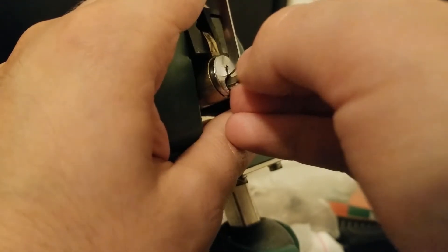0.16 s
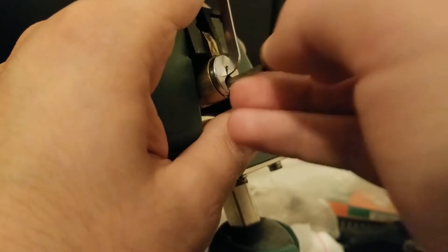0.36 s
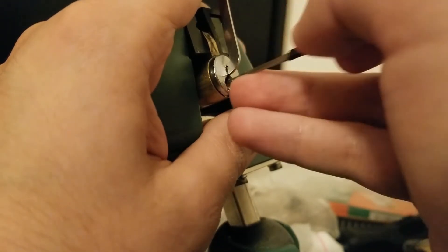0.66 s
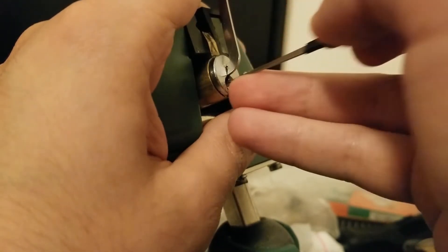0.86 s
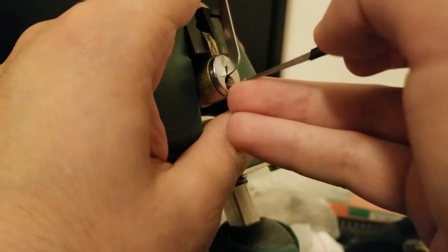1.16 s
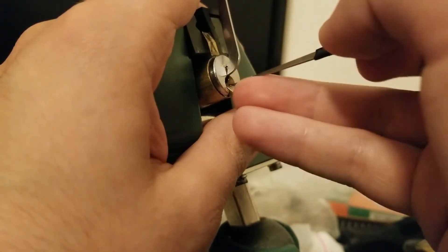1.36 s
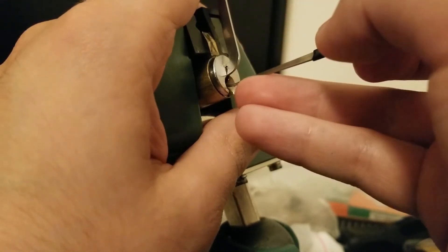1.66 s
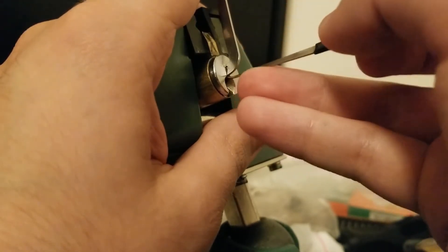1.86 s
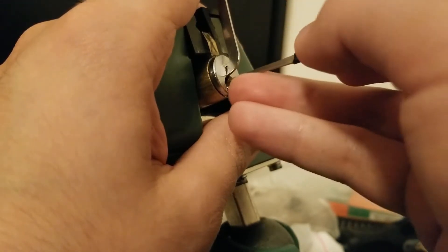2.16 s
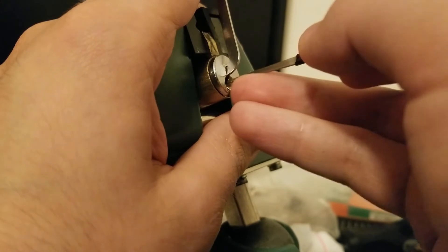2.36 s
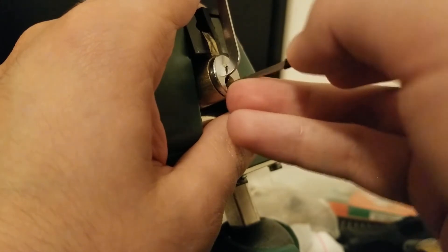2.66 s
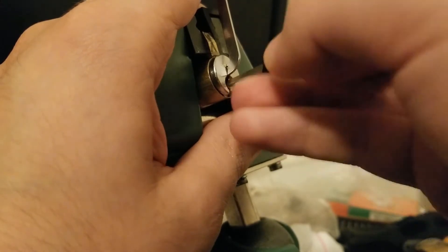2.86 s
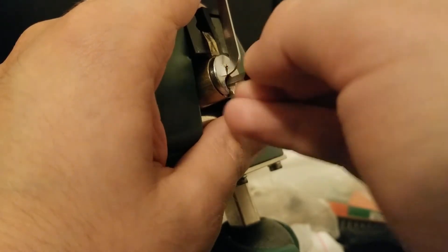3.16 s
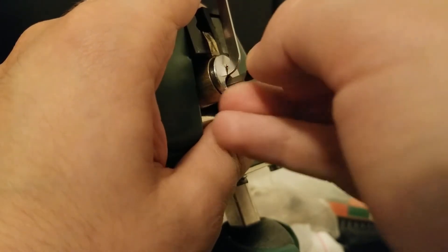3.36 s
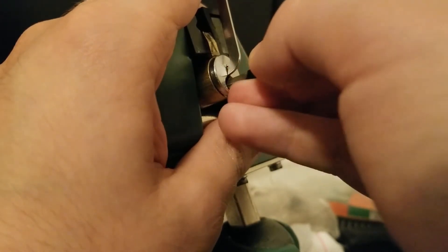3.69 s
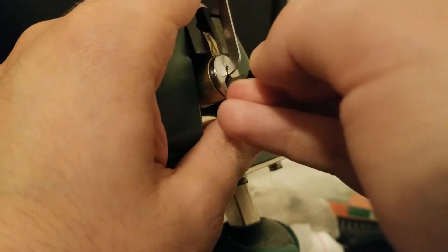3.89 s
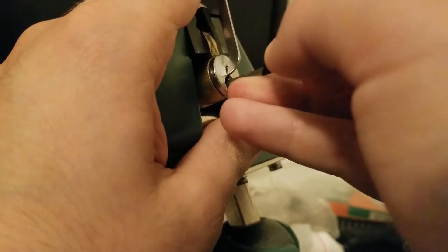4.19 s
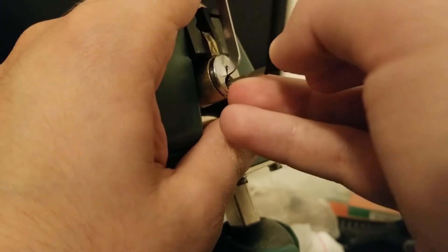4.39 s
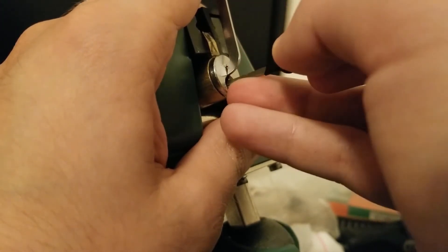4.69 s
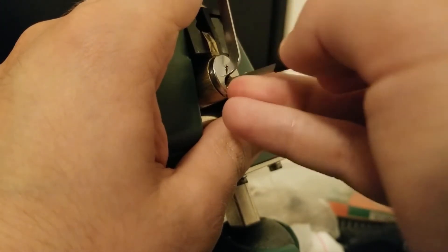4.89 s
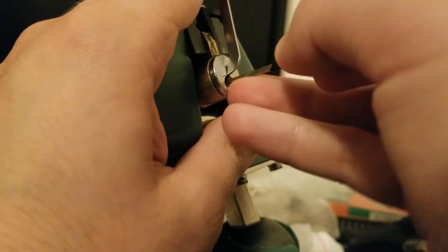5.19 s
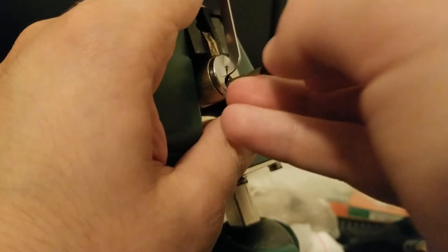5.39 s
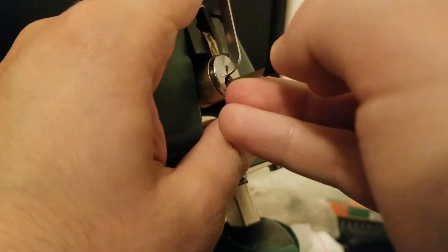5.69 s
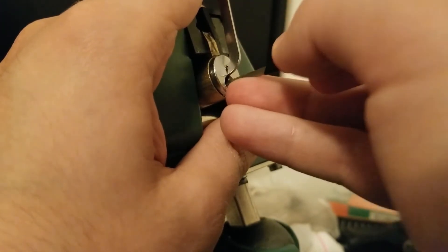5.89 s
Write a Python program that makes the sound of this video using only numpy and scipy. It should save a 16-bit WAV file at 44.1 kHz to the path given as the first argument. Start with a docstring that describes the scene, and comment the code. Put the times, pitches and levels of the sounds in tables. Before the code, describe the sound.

A small quiet room, close microphone, with soft low rumble and thin hiss throughout. From 0.2 to 0.65 s a steel pick makes faint, bright, crisp ticks in a lock, slightly to the right, while a barely audible low hum passes. Only room noise remains until about 1.9 s, when a few tiny clicks and a minute high squeak at 2.0 s appear. From 2.4 to 3.15 s the clicks grow busier, with a light knock at 2.47, a brighter tick and short rasp near 2.9, and a deep drone swelling around 2.6. Quiet again, with faint touches near 3.8 s. At 4.06 s a sharp double snap rasps and rings briefly. At 4.8 s comes the loudest hit, a hard metallic clack with scrape, vice ring and dull bench thump, rebounding until 4.9. Faint isolated ticks follow at 5.2, 5.5 and 5.9 s, ending around 6 s.

```python
"""In a small, quiet room a thin steel pick works the pins of a lock clamped in a vice, close to a camera.
Each contact is a short cluster of tiny impacts that rings the steel and knocks the lock body; in scrapes
the pick rasps along the keyway. Two bursts of hard slips stand out, and the second shakes the vice strongly.
One tiny squeak is a wavering tone. Behind it all lie filtered noise, for a faint rumble and hiss,
and two low wavering tones: a drone that swells and a hum that comes and goes."""
import sys
import numpy as np
from scipy import signal
from scipy.fft import rfft, irfft, next_fast_len
from scipy.io import wavfile
from scipy.ndimage import map_coordinates

SR = 44100
rng = np.random.default_rng(int(sys.argv[2]) if len(sys.argv) > 2 else 0)


def file_out(sig):
    """Save sig as 16-bit WAV at sys.argv[1]."""
    # one column per channel
    cols = np.atleast_2d(sig).T
    # limit, then scale
    lim = np.clip(cols, -1, 1)
    pcm = np.round(lim * 32767).astype(np.int16)
    wavfile.write(sys.argv[1], SR, pcm)


N = 266540


def contacts(knock_room_db=-13):
    """Each contact ticks the steel; from the slip on it also knocks the lock body."""
    # The pick slipping off a pin. Each row: start in seconds, length of the slip in seconds,
    # level of the steel tick in dB, its brightness in dB, level of the knock on the lock body in dB,
    # left level minus right level of the tick in dB.
    pin_slips = [(0.179, 0.0048, -38.5, 0.5, -77.5, -12), (0.281, 0.0064, -30, 2, -86, -6),
                 (0.298, 0.0079, -32.5, -0.5, -83, -7), (0.319, 0.005, -41.5, -4, -75, -12),
                 (0.333, .006, -37, -3, -78, -10), (0.464, 0.0016, -47, 5, -90, -8),
                 (0.4891, 0.0046, -40.5, -0.5, -78, -5), (0.516, 0.0045, -38.5, 0.5, -80, -14),
                 (0.637, 0.0049, -43.5, 3, -74.5, -15), (1.895, 0.00068, -46.5, 10.5, -86, 2),
                 (2.052, 0.0014, -40, 22, -66.5, -6), (2.113, 0.0015, -43, 12.5, -75.5, -23),
                 (2.397, 0.0033, -49, 10.5, -53, -7), (2.47, 0.0083, -30, -0.5, -57.5, -5),
                 (2.715, 0.0053, -35, 2, -56.5, -7), (2.742, .007, -32, 3.5, -55.5, -7.5),
                 (2.856, .0015, -43, 3, -71, -26), (2.8817, .0037, -27.5, 6, -74, -21),
                 (2.8855, 0.0054, -24.5, 1, -77, -12), (2.952, .0013, -41.5, -3, -70, -18),
                 (3.028, 0.002, -45, 6, -75, -24), (3.093, 0.0062, -38.5, -18, -65, -11),
                 (3.105, 0.0076, -30.5, 2.5, -73, -9), (3.133, 0.0028, -43, -2, -67, -13),
                 (3.775, 0.0032, -50.5, -11.5, -71.5, -14), (3.787, 0.01, -47.5, -5.5, -69, -20),
                 (4.0582, 0.007, -15.5, 0, -35, -9.5), (4.0836, 0.0024, -21.5, -3, -43, -17),
                 (4.0862, 0.0049, -17, -.5, -40, -6.5), (4.801, 0.0044, -15, -0.5, -16, -8.5),
                 (4.836, 0.004, -23, 3.5, -40.5, -14), (4.8419, .008, -15.5, 2, -32, -9),
                 (5.212, .0025, -38.5, -0.5, -60.5, -9), (5.489, .005, -63, -6.5, -91, -11),
                 (5.506, .003, -59.5, -6, -78, -14), (5.907, .0026, -47, 4.5, -80, -9)]
    # Faint ticks sound wetter than hard ones: room level falls with each dB of strength.
    usual_tick_db, tick_room_db, drier_db_per_db = -41, -4.5, 0.5
    out = np.zeros((2, N))
    for start, length, steel_db, bright_db, body_db, pan_db in pin_slips:
        room_db = tick_room_db - drier_db_per_db * (steel_db - usual_tick_db)
        for when, part_db in impacts(start, length, steel_db):
            ringing = steel(slip(length, alike=0.15), bright_db)
            tick = amp(steel_db + part_db) * packed(ringing, seconds=0.003)
            add(out, when, panned(tick, pan_db))
            add(out, when, amp(room_db) * room(tick))
            if when >= start:  # the light touch before the slip does not knock the body
                blow = softened(lock_body(slip(length, alike=0.51)), body_db)
                knock = amp(body_db + part_db) * packed(blow, seconds=0.012)
                add(out, when, panned(knock, pan_db=-1))
                add(out, when, amp(knock_room_db) * room(knock))
    return out


def impacts(start, length, steel_db):
    """A contact is a light touch, a slip and, if hard, two rebounds of the pin on its spring: (s, relative dB)."""
    touch_lead, touch_db, touch_max_db = 0.89, -11, -35.5  # lead in slip lengths, level against slip, upper limit
    hard_db = -26  # a stronger tick than this makes the pin rebound
    rebound_s, rebound_db, rebound_change_db = 0.011, -13, -7.5  # spacing, first level, change at the next
    touch = (start - touch_lead * length, min(touch_db, touch_max_db - steel_db))
    parts = [touch, (start, 0)]
    if steel_db > hard_db:
        for k in range(2):
            parts.append((start + (k + 1) * rebound_s, rebound_db + k * rebound_change_db))
    return parts


def slip(length, alike, size=4096):
    """The force of a slip is a burst of tiny uneven impacts that dies out soon after the given length."""
    t = np.arange(size) / SR
    grip = map_coordinates(rng.standard_normal(size // 32 + 1), [np.arange(size) / 32], order=1)
    catches = amp(5 * np.tanh(grip))  # strength varies within 5 dB either way
    rise = 1 - np.exp(-t / (0.2 * length))
    stroke = rise / (1 + (t / (1.15 * length)) ** 8)
    return pair(size, alike) * stroke * catches


def steel(force, bright_db=1):
    """Pick and pins ring high and very briefly; the tip excites upper resonances, the flank lower ones."""
    # Resonances of pick and pins. Each row: frequency in Hz, relative level in dB per Hz.
    steel_curve = [(1000, -39.5), (4300, -22.5), (4800, -18.5), (5150, -1), (5700, -2.5), (6500, -5),
                   (7500, 0), (8500, -13.5), (10300, -6.5), (11300, -1.5), (12600, 1), (14300, -2.5),
                   (15300, -4), (16500, -19.5)]
    tilted = []
    for hz, db in steel_curve:
        tilt_db = bright_db / 2 * np.tanh((hz - 9000) / 1500)
        tilted.append((hz, db + tilt_db))
    return convolve(force, causal(tilted))


def lock_body(force, modes_db=-1):
    """The heavier lock answers lower: a dense clack and some longer, clearer resonances (modes)."""
    # Dense resonances of the lock body. Each row: frequency in Hz, relative level in dB per Hz.
    body_curve = [(200, -17.5), (650, -6), (850, -26.5), (1100, -2), (1600, 2), (2200, -7.5), (3300, -4.5),
                  (4600, 1), (7000, -6), (10000, -25)]
    # Clear modes of the lock body. Each row: frequency in Hz, relative level in dB, time to fall 60 dB in seconds.
    body_rings = [(1113, -5, 0.085), (1250, -8.5, 0.091), (1456, -6, 0.053), (1570, -4.5, .07),
                  (1700.5, 2.5, 0.061), (1793, -8.5, 0.036), (3170, -8.5, 0.058), (4510, -6.5, .05),
                  (4710, -4, 0.036)]
    clack = convolve(force, causal(body_curve))
    modes = ring(body_rings, spread_db=0.0, attack=0.0038, fuzz=0.84, size=clack.shape[1])
    return unit(clack) + amp(modes_db) * unit(modes)


def softened(x, blow_db, corner_hz=2200, db_per_octave=15):
    """A gentle blow stays in contact longer, so it is duller than a hard one."""
    octaves_up = max(blow_db + 55.5, 0) / db_per_octave  # only blows above -55.5 dB get brighter
    corner = np.clip(corner_hz * 2 ** octaves_up, 500, SR / 3)
    return signal.sosfilt(signal.butter(4, corner, fs=SR, output="sos"), x)


def scrapes(room_db=-13.5):
    """The pick drags over rough brass: a longer run of tiny impacts that rasp in the keyway."""
    # The pick dragged along the keyway. Each row: start in seconds, length in seconds,
    # level of the steel in dB, level of the rasp in dB.
    drags = [(0.278, 0.044, -48, -68), (0.446, 0.035, -57, -90), (0.653, 0.048, -65, -81),
             (2.716, 0.047, -60.5, -69), (2.859, 0.025, -51, -75.5), (2.88, 0.026, -39.5, -50),
             (2.906, 0.03, -57, -42), (3.031, 0.09, -54.5, -66), (4.059, 0.034, -36.5, -33.5),
             (4.095, 0.033, -56, -45), (4.798, 0.042, -39, -27.5), (4.849, 0.027, -51.5, -37.5),
             (4.887, 0.021, -71, -48.5)]
    # Colour of the rasp in the keyway. Each row: frequency in Hz, relative level in dB per Hz.
    rasp_curve = [(200, -2), (550, -10), (820, -20.5), (1150, -5), (1400, -4.5), (1720, 5.5), (2050, -3),
                  (3200, -4.5), (4800, -2), (9000, -14.5)]
    out = np.zeros((2, N))
    for start, length, steel_db, rasp_db in drags:
        force = slip(length, alike=0.56)
        bright = amp(steel_db) * packed(steel(force), length)
        rasp = amp(rasp_db) * packed(convolve(force, causal(rasp_curve)), length)
        add(out, start, panned(bright, pan_db=-11))
        add(out, start, panned(rasp, pan_db=-1.5))
        add(out, start, amp(room_db) * room(bright + rasp))
    return out


def squeak(waver_hz=90, room_db=-6):
    """For an instant the pick rubbing on brass sings at a resonance, as one wavering tone."""
    peak_s, squeak_hz, fade_s, squeak_db = 2.006, 5080, 0.007, -65.5
    tone = wavering_tone(squeak_hz, waver_hz, rate=300)
    envelope = amp(squeak_db) * swell(peak_s, peak_s, fade_s, fade_s)
    chirp = panned(envelope * tone, pan_db=11)
    return chirp + amp(room_db) * room(chirp)[:, :N]


def mount(room_db=-15):
    """Hard slips jolt the vice, which rings; the bench under it gives soft, low thumps."""
    # Jolts that reach the vice. Each row: start in seconds, level in dB.
    vice_jolts = [(2.47, -55), (2.917, -66), (4.064, -49), (4.089, -49.5), (4.802, -25), (4.84, -37)]
    # Dull thumps of the bench under the vice. Each row: start in seconds, level in dB.
    bench_thumps = [(2.919, -44.5), (4.086, -51), (4.819, -31.5), (4.865, -44.5), (4.9, -41.5)]
    # Modes of the vice. Each row: frequency in Hz, relative level in dB, time to fall 60 dB in seconds.
    vice_rings = [(220, -20.5, 0.03), (299, 0, 0.19), (368, -5, .12), (445, -3.5, 0.097), (558, -2.5, .07),
                  (596, -6, 0.065), (718, -5, .07)]
    # Modes of the bench. Each row: frequency in Hz, relative level in dB, time to fall 60 dB in seconds.
    bench_rings = [(85, -8, .14), (126, -3, 0.094), (165, -7.5, 0.067)]
    out = np.zeros((2, N))
    for start, db in vice_jolts:
        ringing = ring(vice_rings, spread_db=2.5, attack=0.0018, fuzz=0.99)
        clunk = amp(db) * packed(ringing, seconds=0.02)
        add(out, start, clunk)
        add(out, start, amp(room_db) * room(clunk))
    for start, db in bench_thumps:
        ringing = ring(bench_rings, spread_db=2.5, attack=0.013, fuzz=0.4)
        add(out, start, amp(db) * packed(ringing, seconds=0.016))
    return out


def ring(modes, spread_db, attack, fuzz, apart=0.00016, size=8192):
    """Modes start together and die away, with random strengths (spread_db) and drifting phase (fuzz)."""
    t = np.arange(size) / SR
    hz, db, t60 = np.transpose(modes)[:, :, None]
    strength = db + spread_db * rng.standard_normal(hz.shape)
    drift = fuzz * np.cumsum(rng.standard_normal((len(modes), size)), axis=1) / np.sqrt(SR)
    delay = apart * rng.standard_normal((2, len(modes), 1))  # each mode reaches the two ports by its own path
    waves = amp(strength - 60 * t / t60) * np.sin(2 * np.pi * (hz * (t - delay) + drift))
    return waves.sum(1) * (1 - np.exp(-t / attack))


def room(x, build=0.0042, size=16384):
    """Echoes from the walls build up into a diffuse tail, made of noise that fades at each pitch's own rate."""
    # Fading of the room. Each row: frequency in Hz, time to fall 60 dB in seconds.
    decay_times = [(150, .25), (1500, 0.23), (5000, 0.23), (12000, 0.24), (16000, 0.29)]
    hz, t, z = signal.stft(rng.standard_normal((2, size)), SR, nperseg=256)
    decay = amp(-60 * t / along(decay_times, hz)[:, None])
    tail = signal.istft(z * decay, SR, nperseg=256)[1]
    tail = tail * (1 - np.exp(-np.arange(tail.shape[1]) / SR / build))
    return panned(convolve(x, packed(tail, 1 / SR)), pan_db=-2.5)


def background(rumble_db=4, hiss_db=-14):
    """Low room rumble and a thin hiss share one slow level curve; a drone and a hum are added."""
    # Level shared by rumble and hiss. Each row: time in seconds, level in dB.
    shared_level = [(0.0, -64.5), (0.42, -62.5), (1.31, -65.5), (2.17, -60.5), (2.81, -56.5), (4.84, -60.5),
                    (4.96, -62), (6.04, -63)]
    # Colour of the hiss. Each row: frequency in Hz, relative level in dB per Hz.
    hiss_curve = [(1000, -8), (4000, -12), (5500, -9.5), (8500, -17), (10000, -14), (12200, -2.5),
                  (15500, -4)]
    rumble = amp(rumble_db + 0.49 * wobble(5.4)) * rumble_noise()
    hiss_noise = filtered(pair(N, alike=0.049), lambda hz: amp(along(hiss_curve, hz)))
    hiss = amp(hiss_db) * unit(hiss_noise)
    return amp(curve(shared_level)) * (rumble + hiss) + low_tones()


def rumble_noise():
    """The lowest noise is nearly alike at both ports and the higher noise is not: a sum and difference mix."""
    # Colour of the rumble. Each row: frequency in Hz, relative level in dB per Hz.
    rumble_curve = [(20, -13.5), (36, -18.5), (50, -2), (68, 0.5), (95, -5.5), (125, -4.5), (165, -13.5),
                    (205, -7.5), (290, -13.5), (380, -15), (520, -22), (850, -38), (2000, -42.5),
                    (5000, -58), (12000, -72.5)]
    # Likeness of left and right. Each row: frequency in Hz, likeness (0 unrelated, 1 the same).
    likeness = [(60, .92), (300, 0.79), (1000, 0.13), (4000, 0.054)]

    def mid_side_response(hz):
        angle = np.arccos(np.clip(along(likeness, hz), -1, 1)) / 2
        return amp(along(rumble_curve, hz)) * np.array([np.cos(angle), np.sin(angle)])

    mid, side = filtered(rng.standard_normal((2, N)), mid_side_response)
    return unit(np.array([mid + side, mid - side]))


def low_tones(drone_hz=67, hum_hz=242):
    """Two sine waves waver in pitch: a steady drone with added swells, and a hum that comes and goes once."""
    # Swells of the drone. Each row: time of the top in seconds, level of the added swell in dB.
    swell_tops = [(.77, -65.5), (2.579, -44.5)]
    drone_db, rise_s, fall_s = -67.5, 0.1, 0.16  # steady level, time constants of a swell
    hum_start_s, hum_end_s, hum_fade_s, hum_db = 0.22, 0.69, 0.15, -66
    drone = amp(drone_db)
    for top, db in swell_tops:
        drone = drone + amp(db) * swell(top, top, rise_s, fall_s)
    hum = amp(hum_db) * swell(hum_start_s, hum_end_s, hum_fade_s, hum_fade_s)
    return drone * wavering_tone(drone_hz, 0.97, rate=7) + hum * wavering_tone(hum_hz, 1.57, rate=7)


def wavering_tone(hz, waver_hz, rate):
    """A sine wave of rms 1 whose pitch wanders at random."""
    return unit(np.sin(2 * np.pi * np.cumsum(hz + waver_hz * wobble(rate)) / SR))


def swell(start, end, rise, fall):
    """An envelope that rises to 1 at start, holds until end and dies away (all in seconds)."""
    t = np.arange(N) / SR
    return np.exp(np.minimum(t - start, 0) / rise - np.maximum(t - end, 0) / fall)


def amp(db):
    """Turn dB into a plain factor."""
    return 10 ** (np.asarray(db) / 20)


def unit(x):
    """Scale x to an average strength (rms) of 1."""
    return x / np.sqrt(np.mean(x ** 2) + 1e-30)


def packed(x, seconds):
    """Give x the energy of a sound of rms 1 that lasts so many seconds."""
    return unit(x) * np.sqrt(seconds * SR / x.shape[-1])


def along(points, hz):
    """Read a curve of (Hz, value) points on a logarithmic frequency axis."""
    f, v = np.transpose(points)
    return np.interp(np.log(hz + 1), np.log(f + 1), v)


def curve(rows):
    """One value per sample from (s, value) rows."""
    return np.interp(np.arange(N) / SR, *np.transpose(rows))


def wobble(rate):
    """A smooth random curve through so many random points a second."""
    return map_coordinates(rng.standard_normal(int(N * rate / SR) + 4), [np.arange(N) * rate / SR])


def filtered(x, response):
    """Scale each frequency of x by response(Hz)."""
    m = next_fast_len(N + SR // 2)
    return irfft(rfft(x, m) * response(np.fft.rfftfreq(m, 1 / SR)), m)[..., :N]


def convolve(a, b):
    """Let every sample of a set off a copy of b."""
    return signal.fftconvolve(a, b, axes=-1)


def add(track, s, x):
    """Mix x into the track at time s."""
    start = max(round(s * SR), 0)
    track[:, start:start + x.shape[-1]] += x[:, :max(N - start, 0)]


def panned(x, pan_db):
    """Tilt left against right at constant power; positive is louder on the left."""
    return x * unit(amp([[pan_db / 2], [-pan_db / 2]]))


def pair(size, alike):
    """White noise at two microphone ports, partly shared."""
    shared, *own = rng.standard_normal((3, size))
    return np.sqrt(alike) * shared + np.sqrt(1 - alike) * np.array(own)


def causal(points, size=1024):
    """A response with the spectrum (Hz, dB) whose energy comes as early as possible (minimum phase)."""
    cepstrum = irfft(np.log(amp(along(points, np.fft.rfftfreq(size, 1 / SR)))))
    cepstrum[1:size // 2] *= 2
    cepstrum[size // 2 + 1:] = 0
    return irfft(np.exp(rfft(cepstrum)))[None]


def scene():
    """Lock, vice and room sound together."""
    return contacts() + scrapes() + squeak() + mount() + background()


def record(dry):
    """The camera cuts the deepest bass, rounds the highest peaks and cuts steeply above its band limit."""
    top_hz = 16000
    lean = signal.sosfilt(signal.butter(4, 42, "highpass", fs=SR, output="sos"), dry)
    rounded = lean / (1 + (lean / 0.8) ** 4) ** 0.25
    return filtered(rounded, lambda hz: 1 / np.sqrt(1 + (hz / top_hz) ** 160))


dry = scene()
out = record(dry)
file_out(out)
```